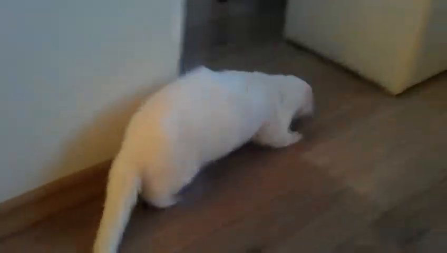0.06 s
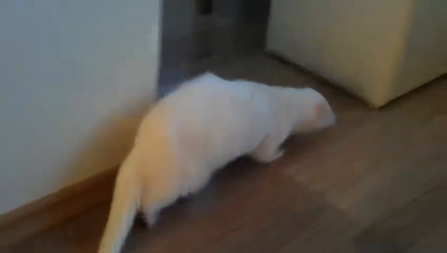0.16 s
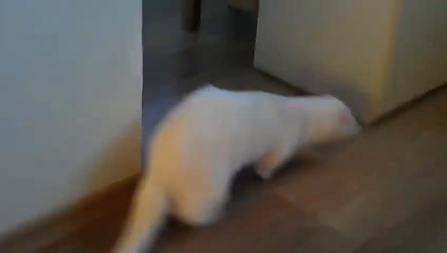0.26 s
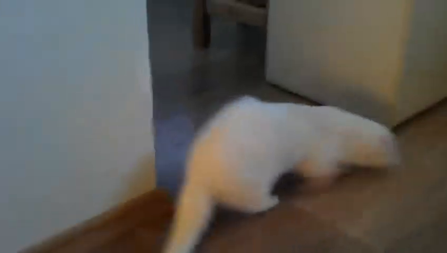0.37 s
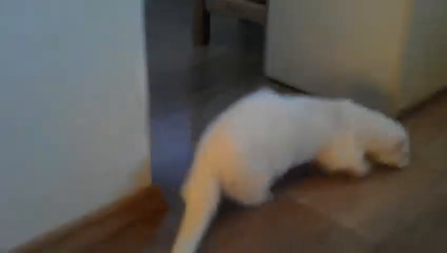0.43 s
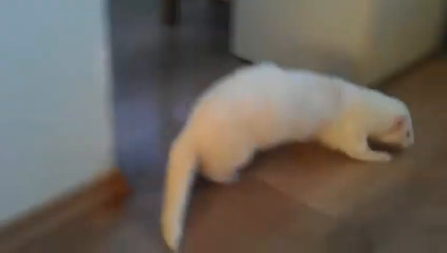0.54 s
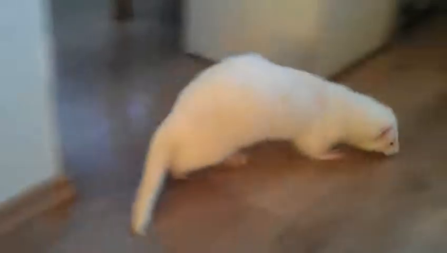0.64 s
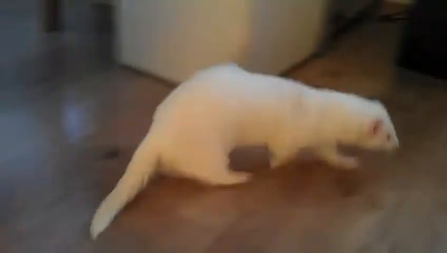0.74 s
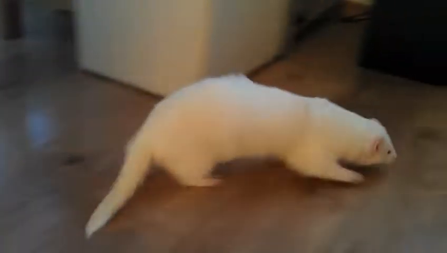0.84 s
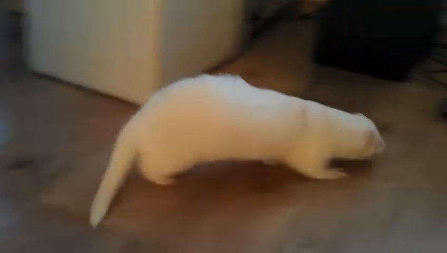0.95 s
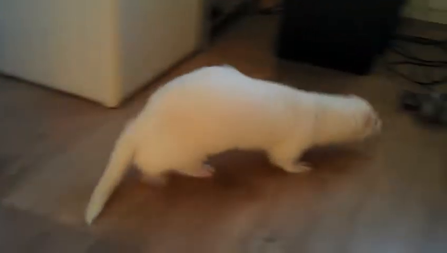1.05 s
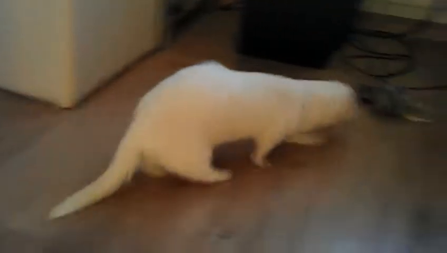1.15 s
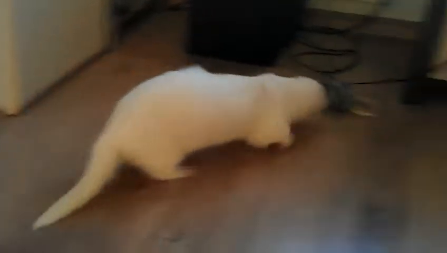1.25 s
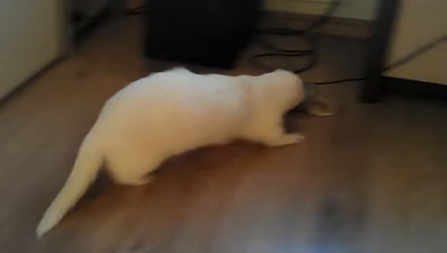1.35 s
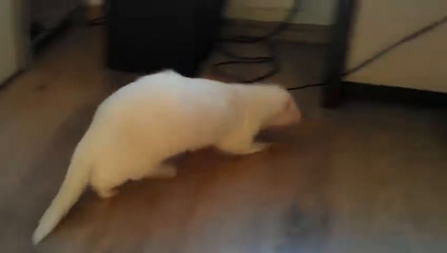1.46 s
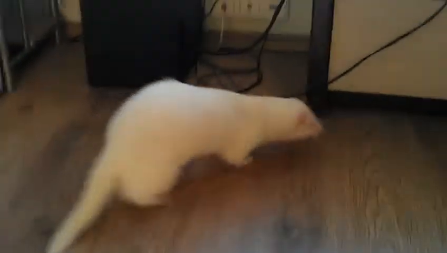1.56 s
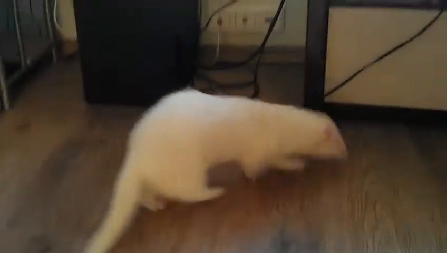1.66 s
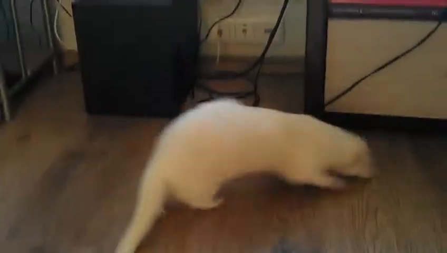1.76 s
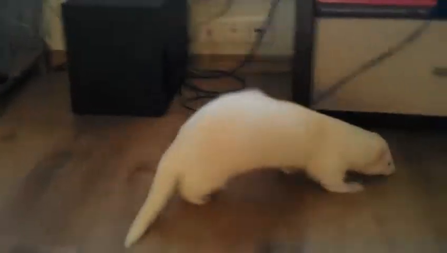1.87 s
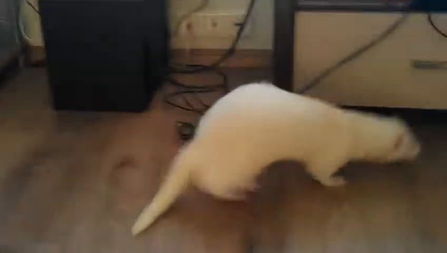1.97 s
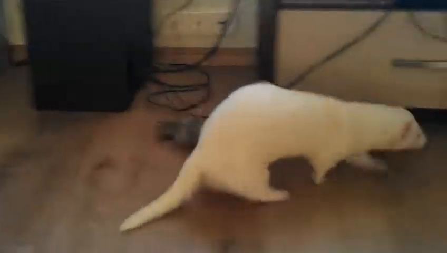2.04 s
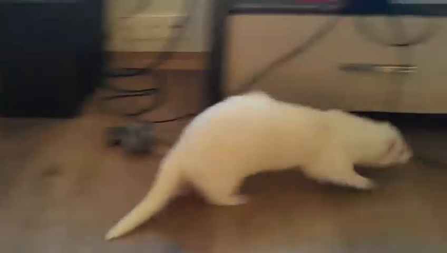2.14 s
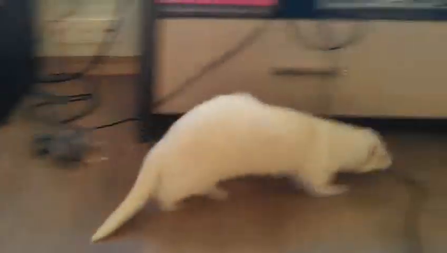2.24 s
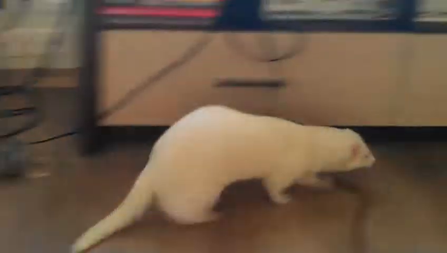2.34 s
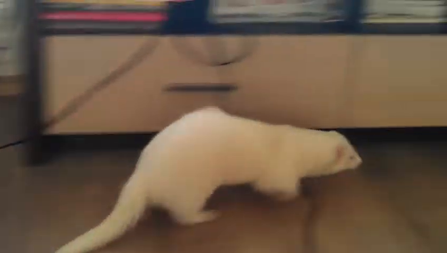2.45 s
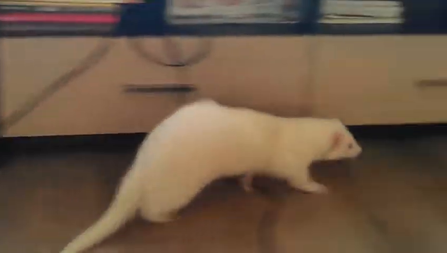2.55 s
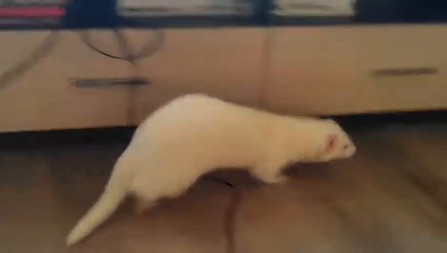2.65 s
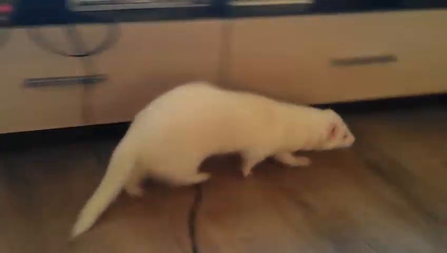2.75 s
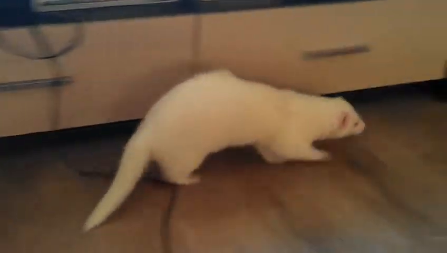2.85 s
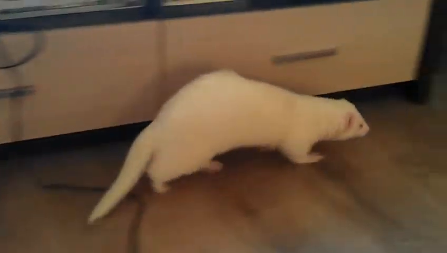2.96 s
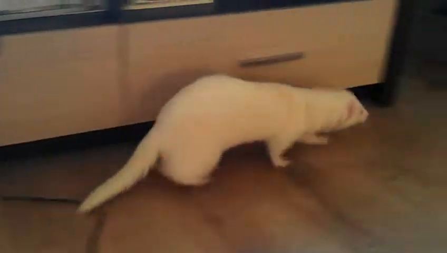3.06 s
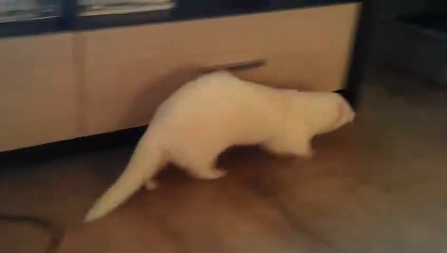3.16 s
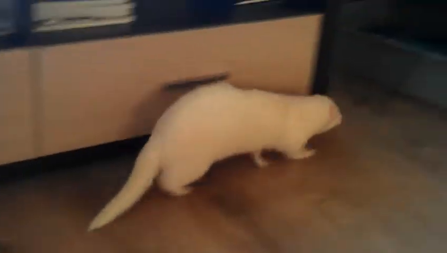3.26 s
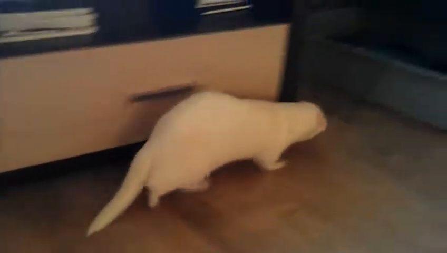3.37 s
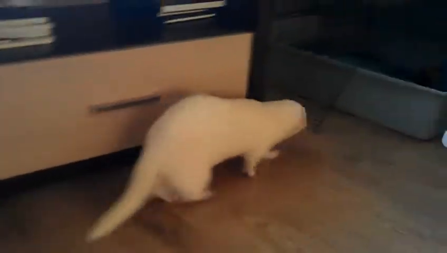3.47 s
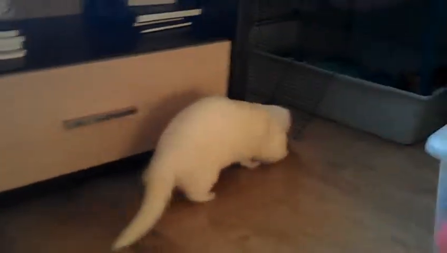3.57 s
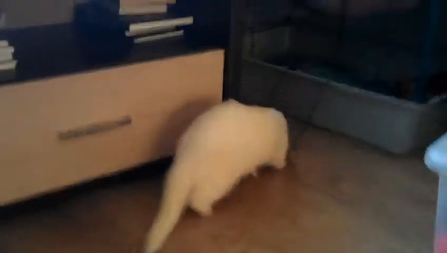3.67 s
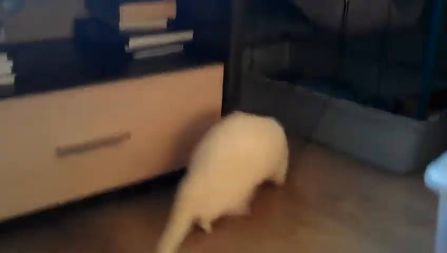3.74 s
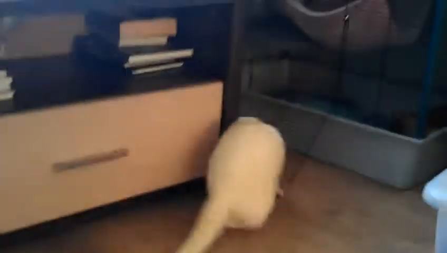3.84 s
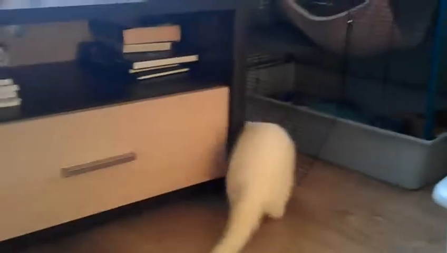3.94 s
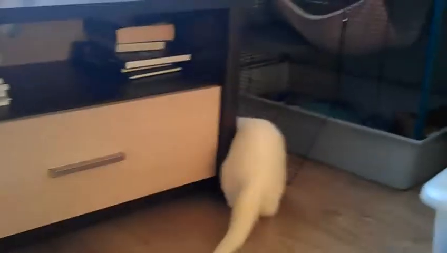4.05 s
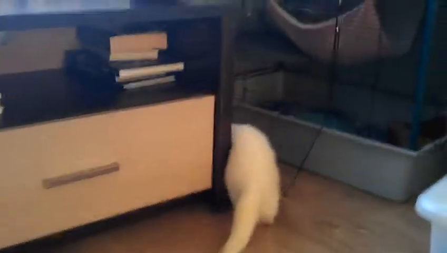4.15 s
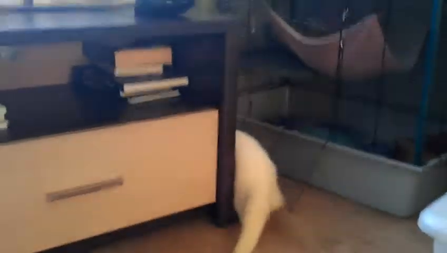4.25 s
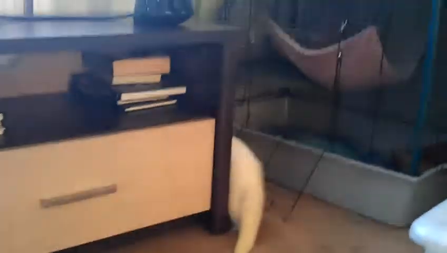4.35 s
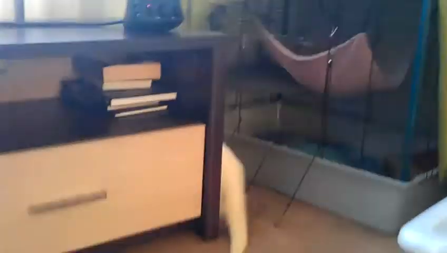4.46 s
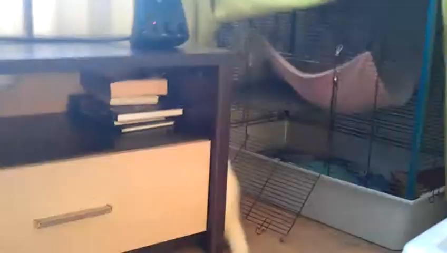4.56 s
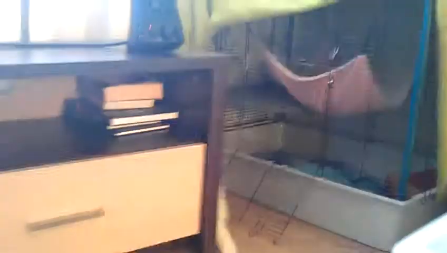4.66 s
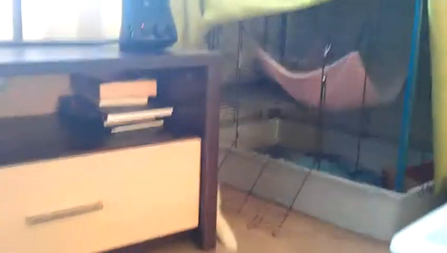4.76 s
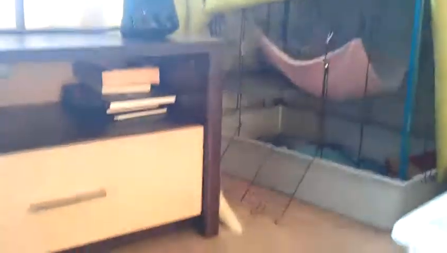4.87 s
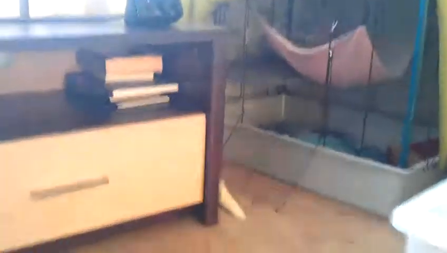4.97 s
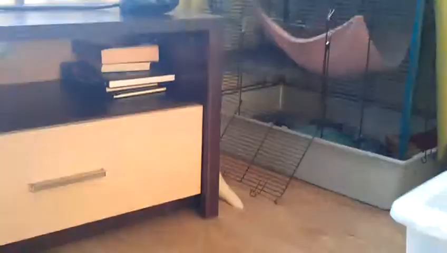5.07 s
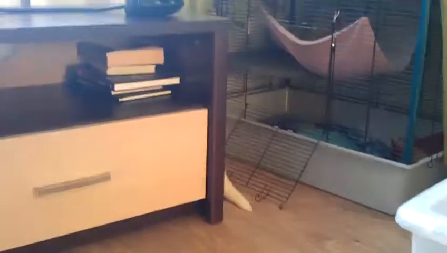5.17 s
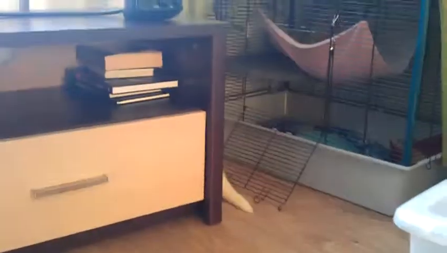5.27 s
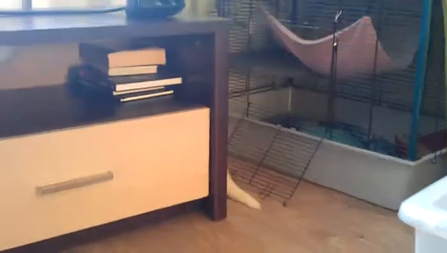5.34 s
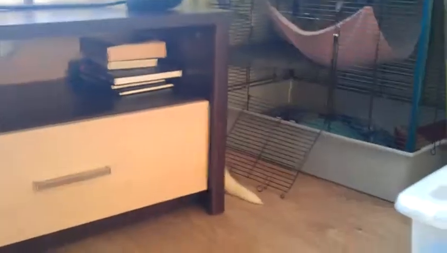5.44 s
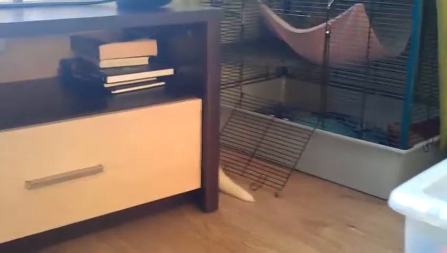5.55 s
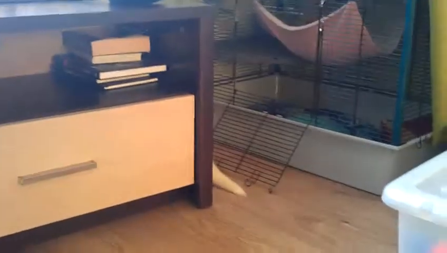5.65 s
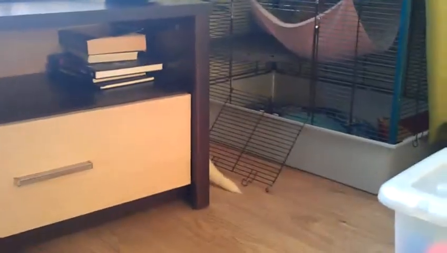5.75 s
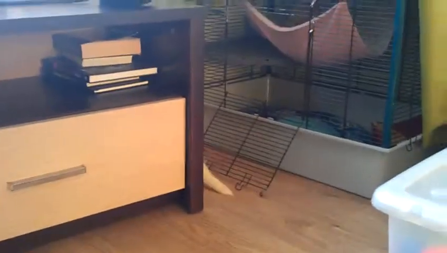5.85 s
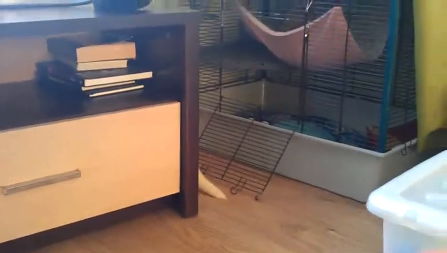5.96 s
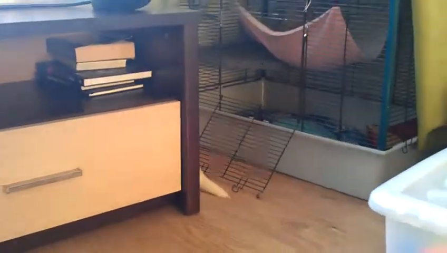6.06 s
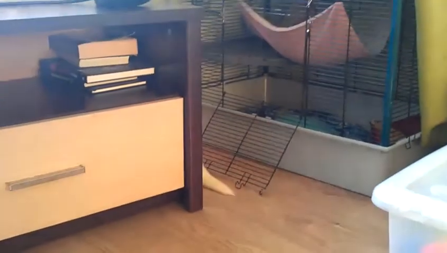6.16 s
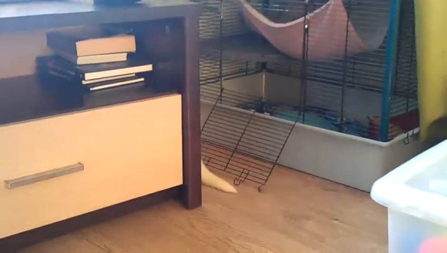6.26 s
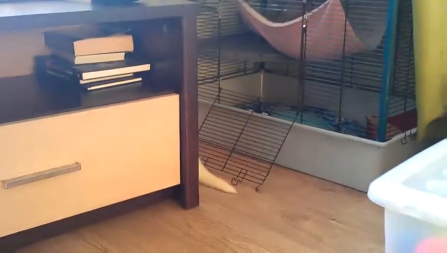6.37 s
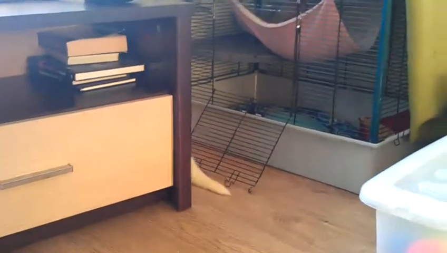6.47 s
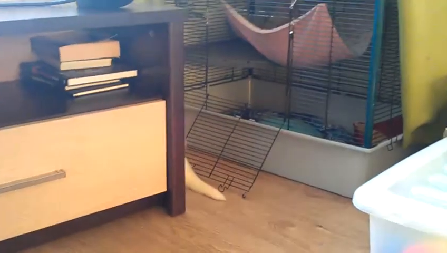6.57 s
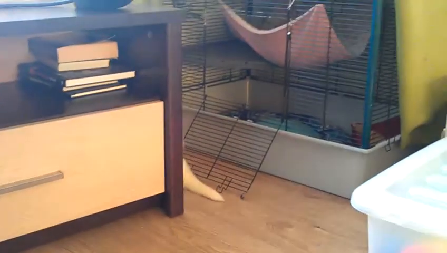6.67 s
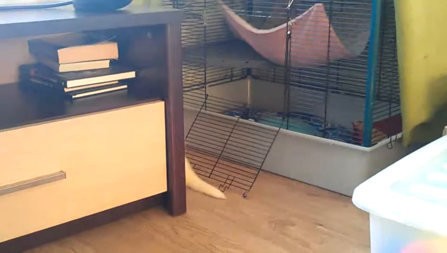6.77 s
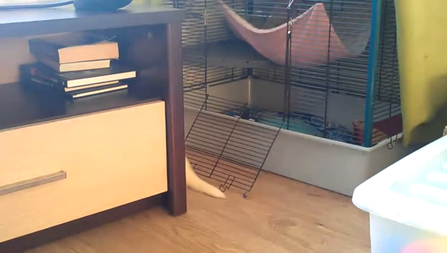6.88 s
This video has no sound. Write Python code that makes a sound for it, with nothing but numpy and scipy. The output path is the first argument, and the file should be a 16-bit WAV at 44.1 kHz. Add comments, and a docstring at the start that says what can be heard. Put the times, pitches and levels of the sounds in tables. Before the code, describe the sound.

A small animal trots across laminate in a furnished room, its claws making bright, gritty scuffs and sharp little ticks at an uneven quick pace. A hard dry snap cracks close by early on. The patter thins as the animal slips behind a cabinet, leaving soft room noise. A moving handheld microphone adds low rumble, dull rustle and a faint wavering hollow tone.

```python
"""Claws scuff and tick over a laminate floor as a ferret trots through a furnished room, behind a cabinet.
Scuffs are trains of random slips under stroke envelopes; ticks are struck, ringing claw tips; knocks excite
board modes. Noise tails give the room's reverberation; one snap stays dry. Below lie a wavering hollow tone
and a low rumble from the hand-held recorder being carried along, and quiet room noise throughout."""
import sys
import numpy as np
from scipy import signal
from scipy.fft import rfft, irfft, next_fast_len
from scipy.io import wavfile
from scipy.ndimage import uniform_filter1d

SR = 44100
rng = np.random.default_rng(int(sys.argv[2]) if len(sys.argv) > 2 else 0)


def to_wav(s):
    """Save 16-bit WAV."""
    ch = np.atleast_2d(s).T  # columns
    pcm = np.round(np.clip(ch, -1, 1) * 32767)  # PCM
    wavfile.write(sys.argv[1], SR, pcm.astype(np.int16))


N = 304731
T = np.arange(N) / SR
SIZE = next_fast_len(N + SR)   # transform length, with room for reverberant tails
HZ = np.maximum(np.arange(SIZE // 2 + 1) * SR / SIZE, 1)

# paw strokes: (time of the top [s], relative level [dB], rise time [s])
PAW_STROKES = [(0.112, -35.5, 0.018), (0.203, -41, 0.073), (0.33, -34, 0.022), (0.46, -33, 0.012),
               (0.598, -31.5, 0.013), (0.682, -39, 0.008), (0.755, -28.5, 0.025), (0.908, -38, 0.008),
               (0.988, -27.5, 0.015), (1.185, -30, 0.031), (1.305, -29.5, 0.0039), (1.404, -27.5, 0.014),
               (1.467, -38.5, 0.013), (1.555, -38.5, 0.012), (1.63, -30, 0.0058), (1.79, -23.5, 0.0072),
               (1.905, -30, 0.011), (1.956, -37, 0.008), (2.049, -30.5, 0.05), (2.253, -25.5, 0.016),
               (2.414, -30, 0.017), (2.436, -32, 0.008), (2.569, -26.5, 0.0075), (2.971, -42, 0.13),
               (3.133, -28.5, 0.027), (3.323, -28.5, 0.031), (3.409, -31.5, 0.0092), (3.516, -30.5, 0.031),
               (3.704, -33.5, 0.035), (3.848, -31, 0.004), (3.908, -30, 0.012), (4.096, -34.5, 0.0091),
               (4.195, -45, 0.01), (4.237, -32, 0.006), (4.317, -41, 0.025), (4.405, -41.5, 0.0082),
               (4.562, -36, 0.04), (4.713, -38, 0.034), (4.86, -39, 0.045), (4.995, -38.5, 0.03),
               (5.03, -31.5, 0.017), (5.082, -51.5, 0.011), (5.712, -49.5, 0.029)]
# edges of the bands in which small slips sound separately: (frequency [Hz])
SLIP_BAND_EDGES = [400, 1800, 3200, 4500, 6000, 7600, 9300, 11500, 16000]


def scuffs(fall_s, own_share, patchy_db):
    """Stick-slip friction: claws dragged over the grain slip unevenly under the swell of each stroke."""
    contact_rises, contact_s = 1.1, 0.0015   # abrupt start, in rise times before the top; its softness [s]
    ramp = 0.6                               # growth rate after contact, per rise time
    crest_db, crest_power = -8, 11.7         # each stroke digs in briefly at its top
    shuffle_db, shuffle_s = 0.5, 0.07        # fur and pads brush on: level [dB], decay time [s]
    dull, bright = np.zeros((2, N))
    treble_db = shine(np.transpose(PAW_STROKES)[0])
    for (top_s, level_db, rise_s), bright_db in zip(PAW_STROKES, treble_db):
        top = round(top_s * SR)
        span = slice(max(top - SR // 4, 0), top + SR // 2)
        t = T[span] - top_s
        swell = np.exp(np.minimum(ramp * t / rise_s, -t / fall_s))
        swell = swell + amp(crest_db) * swell ** crest_power
        swell = swell * np.clip((t + contact_rises * rise_s) / contact_s + 1, 0, 1)
        dull[span] += amp(level_db - bright_db / 2) * swell
        bright[span] += amp(level_db + bright_db / 2) * swell

    keep = np.exp(-1 / (shuffle_s * SR))
    dull, bright = [x + amp(shuffle_db) * signal.lfilter([1 - keep], [1, -keep], x) for x in (dull, bright)]

    whole = slips(per_s=1200, spread_db=3.5)
    share = np.clip(own_share, 0, 1)
    # lone claw taps between strokes follow the quarter-second mean of the strokes
    strays = amp(-13) * uniform_filter1d(bright, size=SR // 4) * slips(per_s=35, spread_db=1.0)
    out = 0
    for low, high in zip(SLIP_BAND_EDGES, SLIP_BAND_EDGES[1:]):
        own = slips(per_s=1500, spread_db=2.0)   # small slips sound in one band only
        drag = np.sqrt(1 - share) * whole + np.sqrt(share) * own
        envelope = dull if high < 8000 else bright
        drag = drag * amp(patchy_db * drift(22.6)) * envelope + strays
        out = out + signal.sosfilt(signal.butter(2, [low, high], "band", fs=SR, output="sos"), drag)
    return out


# claw treble over time: (time [s], level against the middle range [dB])
CLAW_TREBLE = [(0, -3), (.6, -8.5), (1.2, -6.5), (2.3, -4), (3.3, -6), (5.7, -8)]


def shine(s):
    """Spectral tilt of the friction noise at given moments, with random scatter from stroke to stroke."""
    scatter_db = 4
    return np.interp(s, *np.transpose(CLAW_TREBLE)) + scatter_db * rng.standard_normal(len(s))


def slips(per_s, spread_db):
    """Impulse noise: random clicks of very uneven size, clumped by a drifting density; rms 1."""
    sizes = amp(spread_db * np.minimum(rng.exponential(1, N), 5))
    signs = rng.choice([-1, 1], N)
    happens = rng.random(N) < per_s * amp(6 * drift(60)) / SR
    return rms_one(sizes * signs * happens)


# claw strikes: (time [s], relative level [dB], brightness [dB])
CLAW_STRIKES = [(0.106, -16, 13), (0.2042, -24, 8), (0.2673, -17, 5), (0.309, -17.5, 17), (0.4452, -19, 0),
                (0.544, -26.5, -24), (0.564, -22, 9), (0.6622, -9, 5), (0.883, -10, 7), (0.888, -12.5, -4),
                (1.1509, -15, -5), (1.2545, -15.5, -3), (1.302, -9.5, 2), (1.4625, -9, 2), (1.481, -28, 9),
                (1.621, -16, 6), (1.7789, -10, 3), (1.9345, -19, 2), (2.2493, -10.5, 16), (2.2553, -16, 8),
                (2.2614, -7, 9.5), (2.415, -16, 12), (2.632, -23, -15), (2.8153, -25.5, 5), (2.85, -28, 10),
                (2.8917, -7.5, -2), (2.9712, -28, 10), (3.2306, -7.5, 4.5), (3.2848, -7.5, 1),
                (3.3241, -12, 7), (3.406, -16.5, 5), (3.476, -11, 4), (3.609, -23.5, -22),
                (3.668, -18.5, -3), (3.8448, -16, -9), (3.955, -23, 5), (3.985, -20, 1), (4.084, -20.5, 3),
                (4.1642, -20, 7), (4.233, -15, -4), (4.4413, -30, -27), (4.5135, -26, 9),
                (4.8627, -26, -11), (5.071, -13, 8), (5.7021, -32, 6)]


def ticks(ring_db, skid_s, skid_db):
    """Impact excitation: a claw tip strikes, rings, rebounds and skids; dull strikes favour the board."""
    tip_hz, tip_ring_s = (4000, 12000), 0.00025   # range of tip pitches, decay time
    rebound_s, rebound_db = (0.0015, 0.004), -5   # range of delays, level
    body, dull, bright = np.zeros((3, N))
    t = np.arange(400) / SR
    skids = amp(skid_db) * crackle(len(CLAW_STRIKES), skid_s)
    chances = rng.random((len(CLAW_STRIKES), 3))
    for (s, level_db, bright_db), skid, (pitch, lag, side) in zip(CLAW_STRIKES, skids, chances):
        hz = np.interp(pitch, [0, 1], tip_hz)
        ring = amp(ring_db) * np.sin(2 * np.pi * hz * t) * np.exp(-t / tip_ring_s)
        strike = (ring + 1.4 * (t == 0)) * np.sign(side - 0.5)
        again = round(np.interp(lag, [0, 1], rebound_s) * SR)
        burst = skid + strike + amp(rebound_db) * np.roll(strike, again)
        at = round(s * SR)
        body[at:at + 400] += amp(level_db + 3.0 - max(bright_db, -30) * 0.54) * burst
        dull[at:at + 400] += amp(level_db + 1.5 - bright_db * 0.31) * burst
        bright[at:at + 400] += amp(level_db - 3.5 + bright_db * 0.54) * burst
    upper = split(dull, bright, hz=7500)
    return split(body, upper, hz=2960)


# spectrum of claw on board, for scuffs and ticks: (frequency [Hz], level [dB])
CLAW_SPECTRUM = [(500, -36), (1000, -28), (2100, -16), (3100, -17.5), (3700, -5.5), (5500, -3),
                 (9000, -1.5), (12000, 2.5), (14500, -13)]


def claw_colour(x):
    """Spectral shaping: the contact of claw and board imposes its own spectrum."""
    return colour(x, at_hz(CLAW_SPECTRUM))


# blows on the boards: (time [s], relative level [dB], depth, the tilt toward low modes [dB per octave])
BOARD_BLOWS = [(0.141, -38.5, -14.5), (0.544, -22.5, -9), (0.737, -39.5, 15), (0.83, -36, -13.5),
               (3.161, -35.5, 13.5)]
# resonances of the boards: (frequency [Hz], relative level [dB], 60 dB decay time [s])
BOARD_MODES = [(140, -7, 0.074), (240, 0.5, 0.087), (320, 5, 0.065), (383, 0.5, 0.13), (437, 4.5, 0.038),
               (1054, -19, 0.035), (1390, -14.5, 0.013)]


def knocks():
    """Modal resonance: soft blows, each with a rebound, ring the board; deeper blows favour low modes."""
    out = np.zeros(N)
    rebound_s, rebound_db = 0.019, -8.5
    for hz, mode_db, t60 in BOARD_MODES:
        blows = np.zeros(N) + 1e-18
        firsts, seconds = [crackle(len(BOARD_BLOWS), 0.36 / hz) for k in range(2)]
        for (s, level_db, depth_db), first, second in zip(BOARD_BLOWS, firsts, seconds):
            blow_db = level_db + mode_db - 11.5 - depth_db * np.log2(hz / 370)
            for lag_s, push in ((0, first), (rebound_s, amp(rebound_db) * second)):
                at = round((s + lag_s) * SR)
                blows[at:at + 400] += amp(blow_db) * push * np.sqrt(hz / SR)
        # two-pole resonator of this mode
        r, w = amp(-60 / (t60 * SR)), 2 * np.pi * hz / SR
        out += signal.lfilter([0, np.sin(w)], [1, -2 * r * np.cos(w), r * r], blows)
    # boards radiate no deep bass
    return signal.sosfilt(signal.butter(2, 110, "high", fs=SR, output="sos"), out)


def crackle(count, length_s):
    """Transient noise: short bursts of equal energy that swell and die, one a row."""
    t = np.arange(400) / SR / length_s
    bursts = rng.standard_normal((count, 400)) * t * np.exp(-t)
    return bursts * np.sqrt(length_s * SR / np.sum(bursts ** 2, axis=1, keepdims=True))


# late reverberation: (frequency [Hz], 60 dB decay time [s])
REVERBERATION = [(1500, .5), (5000, .5), (10000, .42), (14000, .32)]


def room(near, sent, gap_s, lag_s, count=8):
    """Reverberation with varied tails: random noise tails and left-right lags take turns every 0.16 s."""
    t = np.arange(SR * 3 // 4) / SR
    middles = [np.sqrt(a[0] * b[0]) for a, b in zip(REVERBERATION, REVERBERATION[1:])]
    edges = [150] + middles + [18000]
    noise = rng.standard_normal((count, 2, len(t)))
    tails = 0
    for (hz, t60), low, high in zip(REVERBERATION, edges, edges[1:]):
        band = signal.sosfilt(signal.butter(2, [low, high], "band", fs=SR, output="sos"), noise)
        early = amp(4.5 - 60 * t / 0.041)   # strong first returns from floor and furniture
        late = amp(-60 * t / t60)
        tails = tails + band * (late + early) * (1 - np.exp(-t / gap_s))
    tails = tails / np.sqrt(np.sum(tails ** 2, axis=2, keepdims=True))
    turn = (T / 0.16).astype(int) % count
    out = 0
    for k, lag in enumerate(lag_s * rng.uniform(-1.73, 1, count)):
        shift = np.exp(2j * np.pi * HZ * lag * np.array([[1], [-1]]))
        direct = rfft(near * (turn == k), SIZE) * shift
        reflected = rfft(sent * (turn == k), SIZE) * rfft(tails[k], SIZE)
        out = out + direct + reflected
    return irfft(out, SIZE)[:, :N]


# spectrum of the snap: (frequency [Hz], level [dB])
SNAP_SPECTRUM = [(100, -22), (700, -6.5), (2200, -3), (3300, -1), (4600, 14.5), (7000, -2), (10500, 2.5),
                 (14000, -8)]


def snap():
    """Direct sound alone: a hard crack with a small forerunner, too near and short to stir the room."""
    at_s, peak_db, pan_db = 1.9714, -1.5, 6   # peak before panning; left over right
    out, at = np.zeros(N), round(at_s * SR)
    lead = crackle(count=1, length_s=0.0002)[0]
    main = crackle(count=1, length_s=0.00045)[0]
    out[at - 50:at + 350] += amp(-9) * lead
    out[at:at + 400] += amp(-3) * main
    out[at + 8] += amp(11.5)
    out = colour(out, at_hz(SNAP_SPECTRUM))
    return amp(peak_db) * out / np.abs(out).max() * amp([[pan_db / 2], [-pan_db / 2]])


# hollow tone, wavering while the recorder moves: (time [s], frequency [Hz], relative level [dB])
HOLLOW_TONE = [(.95, 340.3, -64), (1.15, 350, -56), (1.46, 415, -54.5), (1.702, 355, -52),
               (1.92, 369.6, -60.5), (2.099, 400, -49.5), (2.27, 400, -51), (2.55, 345.9, -49),
               (2.74, 341, -58.5), (3.44, 320, -53.5), (3.66, 320, -61.5), (4.14, 332.7, -59),
               (4.4, 328.5, -67.5), (5.58, 328, -61.5), (6.1, 330, -69.5), (6.5, 330, -64)]


def hollow(own_db):
    """Narrow-band noise: slow complex noise modulates a wandering carrier, with the left port leading."""
    width_hz, lead_rad = 88, 1.43
    s, hz, level_db = np.transpose(HOLLOW_TONE)
    carrier = np.exp(2j * np.pi * np.cumsum(np.interp(T, s, hz)) / SR)
    shared, own = [drift(width_hz) + 1j * drift(width_hz) for k in range(2)]
    sides = np.array([shared * np.exp(1j * lead_rad), shared + amp(own_db) * own])
    level = amp(np.interp(T, s, level_db) + 1.64 * drift(7.9))
    return level * np.real(sides * carrier)


# rumble of movement: (time [s], deep part [dB], rustle [dB])
MOVEMENT = [(0, -64, -49.5), (.65, -59, -52), (1.0, -75, -51), (1.2, -60, -51.5), (1.9, -64, -49),
            (2.62, -57.5, -45.5), (2.74, -65.5, -55.5), (3.399, -89, -48), (4.0, -92, -56.5),
            (4.28, -60, -53), (4.5, -77.5, -53.5), (6.9, -77.5, -76)]


def rumble():
    """Modulated diffuse noise: a lumpy deep band and a dull rustle swell separately."""
    s, deep_db, rustle_db = np.transpose(MOVEMENT)
    deep = diffuse(at_hz([(30, -67), (70, -16), (110, 7.5), (220, -1.0), (350, -28.5)]))
    rustle = diffuse(at_hz([(300, -12.5), (600, -8.5), (1400, -10.0), (2200, -9.5), (4000, -14.0)]))
    deep_level = amp(np.interp(T, s, deep_db) + 4 * drift(5.5))
    rustle_level = amp(np.interp(T, s, rustle_db) + 2.8 * drift(12.0))
    return deep_level * deep + rustle_level * rustle


# spectrum of the room noise: (frequency [Hz], relative level [dB])
AIR_SPECTRUM = [(40, -47), (120, -12), (260, -0.5), (590, -2.5), (790, -0.5), (1100, -7.5), (2800, -11.5),
                (4100, -7), (6000, -9.5), (8000, -16), (10700, -10.5), (12500, -13), (14000, -6)]


def air():
    """Stationary diffuse field: steady, quiet room noise."""
    return amp(-52.5) * diffuse(at_hz(AIR_SPECTRUM))


# diffuse sound at the two ports: (frequency [Hz], left-right correlation [-1 to 1])
CORRELATION = [(60, 0.77), (180, 0.97), (530, -0.34), (1580, 0.24), (4720, 0.23), (14000, 0.18)]


def diffuse(db):
    """Partial coherence: mid and side noise mixed to the tabled correlation, spectrum in dB; rms 1."""
    mid, side = rfft(rng.standard_normal((2, SIZE))) * amp(db)
    alike = np.clip(at_hz(CORRELATION), -1, 1)
    stereo = np.sqrt(1 + alike) * mid + np.sqrt(1 - alike) * side * [[1], [-1]]
    return rms_one(irfft(stereo, SIZE)[:, :N])


def drift(rate):
    """Low-pass noise: slow chance of rms 1 from two equal poles at the given rate in Hz."""
    r = np.exp(-80 * np.pi * rate / SR)   # computed at every 40th sample
    slow = signal.lfilter([1], [1, -2 * r, r * r], rng.standard_normal(N // 40 + 2002))[2000:]
    return np.interp(np.arange(N) / 40, np.arange(len(slow)), rms_one(slow))


def colour(x, db):
    """Minimum-phase filtering: the folded cepstrum gives a causal filter of the given level in dB."""
    cepstrum = irfft(np.log(amp(db)), SIZE)
    cepstrum[1:SIZE // 2] *= 2
    cepstrum[SIZE // 2 + 1:] = 0
    response = np.exp(rfft(cepstrum))
    return irfft(rfft(x, SIZE) * response, SIZE)[..., :N]


def split(dull, bright, hz):
    """Crossover: lows from one signal, highs from the other."""
    lows = signal.sosfilt(signal.butter(3, hz, "low", fs=SR, output="sos"), dull)
    highs = signal.sosfilt(signal.butter(3, hz, "high", fs=SR, output="sos"), bright)
    return lows + highs


def at_hz(points, column=1):
    """Logarithmic frequency scale: a table read at every frequency, straight between its points."""
    points = np.array(points)
    return np.interp(np.log(HZ), np.log(points[:, 0]), points[:, column])


def amp(db):
    """Decibel law: level to amplitude gain."""
    return 10 ** (np.asarray(db) / 20)


def rms_one(x):
    """Normalisation of mean power: scale to rms 1."""
    return x / np.sqrt(np.mean(x ** 2) + 1e-20)


def scene():
    """Superposition: near sound, its reflections and the background add."""
    scuffed = claw_colour(scuffs(fall_s=0.017, own_share=0.45, patchy_db=1.5))
    ticked = claw_colour(ticks(ring_db=-3, skid_s=0.0013, skid_db=-11))
    knocked = knocks()
    near = amp(-1.0) * scuffed + ticked + knocked
    # hard taps and knocks stay drier than the scuffs
    sent = amp(-2.0) * scuffed + amp(-3) * ticked + amp(-5) * knocked
    animal = room(near, sent, gap_s=0.00062, lag_s=0.000014)
    return animal + snap() + hollow(own_db=-9.0) + rumble() + air()


# response of the two microphone ports: (frequency [Hz], left [dB], right [dB])
PORT_RESPONSE = [(30, -11.5, -27), (89, -6, -14), (198, 1, -1), (3260, 9.5, 6.5), (5400, 2, 2),
                 (6550, 3.5, 1.5), (7400, -3, -0.5), (8370, 2.5, 10.5), (9530, 5.5, 1), (10570, 9, 3),
                 (13030, 7, -5.5), (14900, 0.5, 4)]


def record(dry):
    """Transducer response: each port adds its colour, full scale clips, the top is cut."""
    left = colour(dry[0], at_hz(PORT_RESPONSE, column=1))
    right = colour(dry[1], at_hz(PORT_RESPONSE, column=2))
    clipped = np.clip(np.array([left, right]), -1, 1)
    # 75 dB down from 14500 Hz upward
    return signal.sosfilt(signal.cheby2(20, 75, 14500, fs=SR, output="sos"), clipped)


dry = scene()
out = record(dry)
to_wav(out)
```